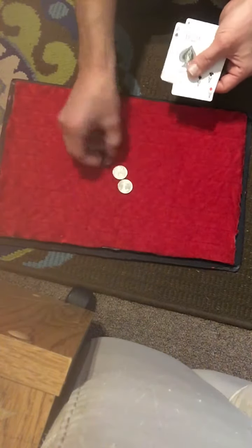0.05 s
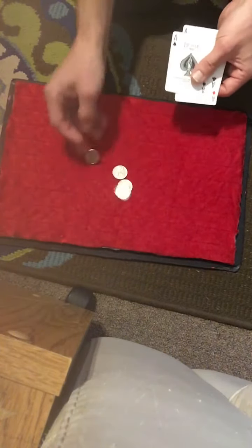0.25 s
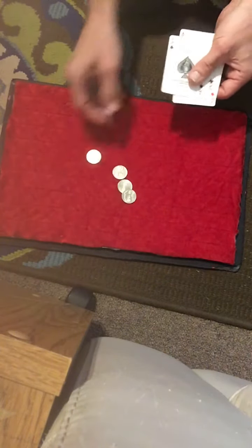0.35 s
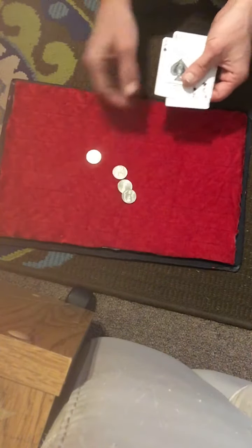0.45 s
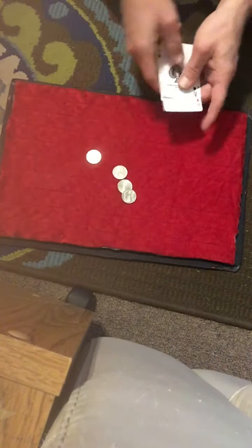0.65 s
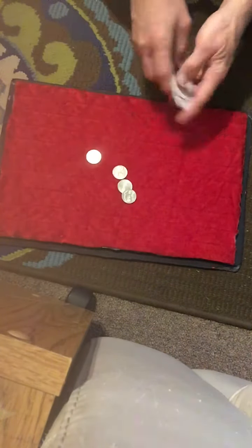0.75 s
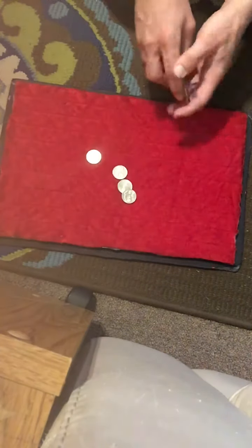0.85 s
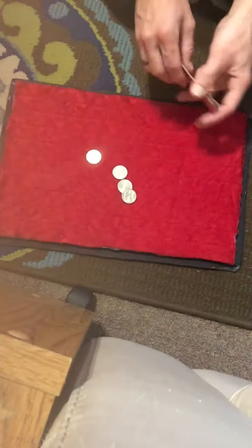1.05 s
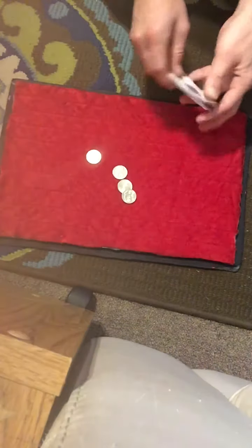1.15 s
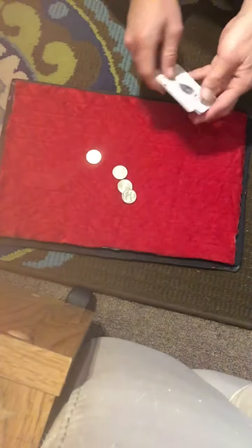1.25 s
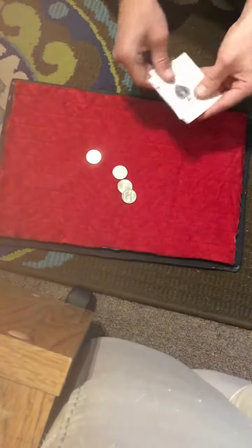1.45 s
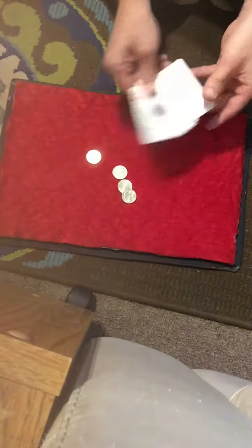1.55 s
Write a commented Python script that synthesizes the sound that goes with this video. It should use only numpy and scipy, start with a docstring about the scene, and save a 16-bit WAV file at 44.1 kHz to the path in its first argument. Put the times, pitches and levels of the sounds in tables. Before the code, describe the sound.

In a quiet room with low ventilation hum, a coin clinks lightly, then lands on other coins on a padded mat with a short, bright chatter. Afterwards, fingers handle playing cards with faint rustles and ticks.

```python
"""Coin drop and playing cards

In a quiet room a coin is picked off a cloth mat and dropped onto other coins. It lands with
soft thumps, chatters on its neighbours and rings in two high clusters of beating modes.
Then playing cards slide and tick faintly between the fingers, over ventilation and mains hum."""
import sys
import numpy as np
from scipy import signal
from scipy.fft import rfft, irfft
from scipy.io import wavfile

SR = 44100
rng = np.random.default_rng(int(sys.argv[2]) if len(sys.argv) > 2 else 0)


def master_out(mix):
    """Clip the mix to full scale and print it as 16-bit PCM to the path in sys.argv[1]."""
    frames = np.transpose(np.atleast_2d(mix))
    ceiling = np.clip(frames, -1, 1)
    pcm = np.round(ceiling * 32767).astype(np.int16)
    wavfile.write(sys.argv[1], SR, pcm)


N = 70560
TIME = np.arange(N) / SR


def from_db(db):
    """Decibels to gain."""
    return 10 ** (np.asarray(db) / 20)


def rms_one(x):
    """Scale to unit rms."""
    return x / np.sqrt(np.mean(x ** 2) + 1e-20)


def colour(x, spectrum):
    """Minimum-phase EQ through the given (Hz, dB) points."""
    hz, db = np.transpose(spectrum)
    freq = np.arange(N + 1) * SR / (2 * N)
    gain = from_db(np.interp(np.log(freq + 1), np.log(hz), db))
    cepstrum = irfft(np.log(gain))
    cepstrum[1:N] *= 2
    cepstrum[N + 1:] = 0
    return irfft(rfft(x, 2 * N) * np.exp(rfft(cepstrum)))[:N]


def impulses(times, sizes):
    """One impulse per event."""
    return np.bincount((np.abs(times) * SR).astype(int), sizes, N)[:N] + 1e-18


def fade(x, decay_s):
    """Give each impulse an exponential decay."""
    return signal.lfilter([1], [1, -np.exp(-1 / (decay_s * SR))], x)


def drift(hz):
    """Slow random wander at unit rms."""
    freq = np.arange(N // 2 + 1) * SR / N
    return rms_one(irfft(rfft(rng.standard_normal(N)) / (1 + (freq / hz) ** 2), N))


def crackle():
    """Flat noise of even strength, the stuff of very short ticks."""
    return rng.choice([-1., 1.], N)


# The dark tone of moving air. Each row: frequency in Hz, relative level in dB.
AIR_EQ = [(20, -34), (35, -9.5), (60, 4), (85, 2.5), (110, -4.5), (160, -6.5), (210, -2), (260, -3),
          (320, 1), (370, -1.5), (430, -6), (500, -6.5), (580, -3.5), (700, -8), (800, -15.5), (950, -17),
          (1200, -17), (2100, -13), (2700, -19.5), (3400, -28), (5000, -33.5), (9000, -36.5), (12000, -40),
          (15500, -43), (16500, -64.5)]


def ventilation(level_db=-59):
    """Air from the vents lays down a steady, low bed of noise."""
    return from_db(level_db) * rms_one(colour(rng.standard_normal(N), AIR_EQ))


# The drone under the scene. Each row: pitch in Hz, level in dB, unsteadiness, throb depth.
HUM_TONES = [(120.3, -65.5, 0.08, 0.11), (236.9, -64, 0.59, 0.96), (358.4, -69, .6, 0),
             (377.3, -72, 0.587, 0), (420, -69, 0.43, 0), (484, -76, 0.3, 0.066),
             (636.6, -75.5, 0.73, 0.11)]


def hum(waver_hz=2.6, throb_hz=5.86, throb_peak_s=1.365):
    """Motors and mains hum in wavering tones, some of them throbbing together."""
    throb = np.cos(2 * np.pi * throb_hz * (TIME - throb_peak_s))
    out = 0
    for hz, db, unsteady, depth in HUM_TONES:
        waver = 1 + depth * throb + unsteady * (drift(waver_hz) + 1j * drift(waver_hz))
        tone = np.exp(2j * np.pi * (hz * TIME + rng.random()))
        out += from_db(db) * rms_one(np.real(waver * tone))
    return out


# The dry tone of a snap. Each row: frequency in Hz, gain in dB.
SNAP_EQ = [(1000, 1), (2000, 0.5), (4000, -3), (6000, -5), (8500, -5.5), (11000, -7), (16000, -18)]
# Nail and card ticks. Each row: start in seconds, level in dB, ring pitch in Hz, ring offset in dB.
SNAPS = [(0.0485, -47, 8860, -2.5), (0.052, -44.5, 6270, -15), (0.71, -60, 6000, -11),
         (.756, -52, 8560, -12), (0.8475, -52.5, 1900, -11), (0.859, -57.5, 3960, -6),
         (1.139, -60, 1900, 8), (1.148, -61, 5500, -6), (1.156, -56, 2100, -2), (1.3402, -56, 8800, -12),
         (1.354, -56, 6020, -9)]


def snaps(decay_s=.0011, ring_s=.002):
    """Nails and card edges catch and slip with tiny dry ticks, each briefly ringing."""
    starts, levels = np.transpose(SNAPS)[:2]
    bursts = fade(impulses(starts, from_db(levels)), decay_s) * crackle()
    out = colour(bursts, SNAP_EQ)
    for start, db, hz, ring_db in SNAPS:
        envelope = fade(impulses([start], [from_db(db + ring_db)]), ring_s)
        out += envelope * np.sin(2 * np.pi * hz * (TIME - start))
    return out


# Whispery slides of cloth and cards.
# Each row: start in seconds, length in seconds, level in dB, centre in Hz, width in octaves.
RUBS = [(.064, 0.007, -64, 8000, 1.0), (.072, 0.0094, -62, 10100, 0.98), (0.081, .022, -68, 12000, 1),
        (0.106, .012, -62, 13000, .3), (0.125, .012, -61, 12300, 0.6), (0.081, 0.03, -72, 3440, 0.1),
        (0.64, .06, -79.5, 6950, 1.0), (0.631, 0.061, -62.5, 720, 0.42), (.753, 0.036, -71, 8000, 0.75),
        (0.802, 0.028, -78, 6330, .4), (0.856, 0.0096, -69, 5400, 0.4), (0.894, 0.032, -77.5, 7500, 0.5),
        (1.026, 0.05, -71, 2780, 0.19), (1.138, 0.032, -64, 2020, 0.2), (1.135, 0.035, -77, 5500, 0.42),
        (1.22, 0.039, -74, 8140, 0.18), (1.421, 0.08, -76.5, 7000, 0.53), (1.459, 0.048, -73.5, 6800, 0.72),
        (1.555, .035, -77.5, 7500, 0.64)]


def rubbing(grains_per_s=460, grain_gain=.24, rise_share=.28):
    """Each slide is a band of grainy friction that swells quickly and falls more slowly."""
    octave = np.log2(np.arange(N // 2 + 1) * SR / N + 1)
    out = 0
    for start, length, db, hz, width in RUBS:
        grains = rms_one((rng.random(N) < grains_per_s / SR) * rng.standard_normal(N))
        friction = rng.standard_normal(N) + grain_gain * grains
        bell = np.exp(-.5 * ((octave - np.log2(hz)) / width) ** 2)
        band = rms_one(irfft(rfft(friction) * bell, N))
        age = np.maximum(TIME - start, 0) / (rise_share * length)
        out += from_db(db) * band * age * np.exp(1 - age)
    return out


# The bright edge of a coin tick. Each row: frequency in Hz, gain in dB.
TICK_EQ = [(1000, -23.5), (2500, -17), (4000, -16), (5200, -19.5), (6500, -9), (7600, -10), (8700, -0.5),
           (9600, 0.5), (11200, 1), (13200, 2), (14300, -6), (15500, 0.5), (16300, -8.5), (17000, -18.5)]


def coin_ticks(times, db, crack_db=-7, crack_s=.00028, hiss_db=-28.5, hiss_s=.013):
    """Sharp coin ticks with a crack, each trailed by a brief faint hiss."""
    hits = impulses(times, from_db(db))
    crack = from_db(crack_db) * fade(hits, crack_s) * crackle()
    hiss = from_db(hiss_db) * np.sqrt(fade(hits ** 2, hiss_s / 2)) * rng.standard_normal(N)
    return colour(hits + crack + hiss, TICK_EQ)


# The coins' shimmer: two clusters of close, beating modes. Each entry: pitch in Hz.
LOWER_HZ = [9166, 9202, 9245, 9376, 9402]
UPPER_HZ = [15140, 15298, 15378, 15400, 15720]
# How those modes ring on cloth. Each row: relative level in dB, time to fall 60 dB in seconds.
LOWER_MODES = [(-8.5, 0.22), (-12.5, 0.15), (-9.5, 0.13), (-3.5, 0.13), (-14.5, .22)]
UPPER_MODES = [(-13.5, 0.072), (-18, .13), (0.5, 0.12), (-19.5, 0.082), (-33, .14)]


def ringing(times, db, pitches, modes, stretch=1, rise_s=.0015):
    """Each contact feeds energy into every mode and nudges its phase; damping drains the energy."""
    out = 0
    for hz, (mode_db, t60) in zip(pitches, modes):
        added = impulses(times, from_db(db + mode_db) ** 2)
        energy = fade(added, stretch * t60 / np.log(1e6))
        fresh_share = (added > 1e-15) * added / energy
        nudges = np.cumsum(fresh_share * rng.uniform(-.6, .6, N))
        swell = fade(energy, rise_s) / (rise_s * SR)
        out += np.sqrt(swell) * np.sin(2 * np.pi * (hz * TIME + rng.random()) + nudges)
    return out


# The coin brushes its neighbours on the way up.
# Each row: start in seconds, tick level in dB, lower ring in dB, upper ring in dB.
PICKUP_TOUCHES = [(.1092, -39, -57.5, -71), (.1328, -50.5, -77.5, -57), (.1352, -38, -68.5, -48.5),
                  (.1448, -48, -62.5, -70)]


def coin_lifted(clink_hz=15200, clink_db=6, clink_s=.005, tip_s=.22, tip_width_s=.011, tip_db=12.5):
    """The rims clink, and the coin sings on between the fingers until the landing damps it."""
    starts, tick_db, lower_db, upper_db = np.transpose(PICKUP_TOUCHES)
    # Held in the fingers, it rings longer than on cloth.
    lower = ringing(starts, lower_db, LOWER_HZ, LOWER_MODES, stretch=4.2)
    upper = ringing(starts, upper_db, UPPER_HZ, UPPER_MODES, stretch=1.5)
    # The lower modes swell as it tips out of the fingers.
    tipping = from_db(tip_db * np.exp(-((TIME - tip_s) / tip_width_s) ** 2))
    landing_s, cloth_t60 = LANDING_HITS[0][0], LOWER_MODES[0][1]
    damping = from_db(-60 * np.maximum(TIME - landing_s, 0) / cloth_t60)
    rim_hits = impulses(starts, from_db(upper_db + clink_db))
    clink = fade(rim_hits, clink_s) * np.sin(2 * np.pi * clink_hz * TIME)
    return coin_ticks(starts, tick_db) + clink + damping * (tipping * lower + upper)


# Soft blows on the mat. Each row: start in seconds, level in dB.
THUMPS = [(0.2209, -33), (.238, -25.5), (.2437, -29), (0.258, -50.5), (.262, -36), (0.2768, -39),
          (0.3164, -28.5)]
# The mat's padded body. Each row: pitch in Hz, level in dB, time to fall 60 dB in seconds.
MAT_MODES = [(187, -25.5, 0.014), (362, 1, 0.018), (562, -4.5, 0.014)]


def mat_thumps(push_s=.0015, band_hz=(100, 750)):
    """Cushioned pushes drive the heavily damped modes of the mat."""
    starts, levels = np.transpose(THUMPS)
    push = np.exp(-((TIME - push_s / 2) / (push_s / 4)) ** 2)
    force = signal.fftconvolve(impulses(starts, from_db(levels)), push / push.sum())[:N]
    body = sum(from_db(db - 60 * TIME / t60) * np.sin(2 * np.pi * hz * TIME)
               for hz, db, t60 in MAT_MODES)
    bandpass = signal.butter(3, band_hz, "band", fs=SR, output="sos")
    return signal.sosfilt(bandpass, signal.fftconvolve(force, body)[:N])


# The hard tone of the landing knock. Each row: frequency in Hz, gain in dB.
KNOCK_EQ = [(500, -20), (1100, -10), (2500, -10.5), (4200, -8.5), (5200, -14.5), (6400, 1), (7600, -9.5),
            (9000, -12), (16000, -23.5)]
# The drop and its chatter.
# Each row: start in seconds, tick level in dB, lower ring in dB, upper ring in dB.
LANDING_HITS = [(.2414, -16, -35.5, -28), (0.2454, -16, -40.5, -24), (0.2609, -23.5, -29, -28.5),
                (0.2709, -21, -44, -45.5), (0.2759, -21, -52.5, -29.5), (.281, -33, -54.5, -60.5),
                (0.2861, -25, -52, -41), (0.2948, -36, -60.5, -66.5), (.3015, -30, -57, -44),
                (.3047, -36, -53, -59), (.309, -27.5, -58, -50), (0.314, -33, -47, -59),
                (0.325, -36, -68, -48), (.3278, -34, -53, -47), (.3328, -38, -65, -48),
                (0.3337, -38, -60, -65), (.3364, -38, -68, -55), (.3402, -39, -73, -68),
                (.3445, -47, -72, -70), (.352, -46, -61, -62), (.363, -50, -74, -61)]


def coin_landing(knock_db=-3, knock_fall_s=.009, settled_s=.35, settled_db_per_s=180):
    """The coin knocks down on the others and rattles to rest while the cloth damps their ring."""
    starts, tick_db, lower_db, upper_db = np.transpose(LANDING_HITS)
    weight = np.exp(-(starts - starts[0]) / knock_fall_s)  # first hits knock, later ones only graze
    knock = colour(impulses(starts, from_db(tick_db + knock_db) * weight), KNOCK_EQ)
    ticks = coin_ticks(starts, tick_db)
    lower = ringing(starts, lower_db, LOWER_HZ, LOWER_MODES)
    upper = ringing(starts, upper_db, UPPER_HZ, UPPER_MODES)
    # Lying flat, the coin loses its upper ring sooner.
    settling = from_db(-settled_db_per_s * np.maximum(TIME - settled_s, 0))
    return knock + ticks + lower + settling * upper


def room(x, t60_s=.3, predelay_s=.0058):
    """A carpeted room answers with a short, diffuse tail."""
    tail = rng.standard_normal(N) * from_db(-60 * TIME / t60_s) * (TIME > predelay_s)
    return signal.fftconvolve(x, tail / np.linalg.norm(tail))[:N]


def scene():
    """Coins and mat with a touch of reverb, dry handling sounds and room tone, in mono."""
    coins = coin_lifted() + coin_landing()
    thumps = mat_thumps()
    reverb = room(from_db(-28) * coins + from_db(-9.5) * thumps)
    return (coins + thumps + reverb + rubbing() + snaps() + ventilation() + hum())[None]


# The microphone's treble colour. Each row: frequency in Hz, gain in dB.
MICROPHONE_EQ = [(4000, 0), (4900, -2.5), (5800, 2), (7400, 0), (9400, 0), (10400, -2.5), (11400, 1.5),
                 (14000, -0.5), (15500, -0.5), (16200, -8.5)]
CUTOFF_HZ = 16700


def record(dry):
    """The microphone ripples the treble; the top is cut steeply."""
    heard = colour(dry[0], MICROPHONE_EQ)[None]
    lowpass = signal.ellip(10, .1, 80, CUTOFF_HZ, fs=SR, output="sos")
    return signal.sosfilt(lowpass, heard)


dry = scene()
out = record(dry)
master_out(out)
```